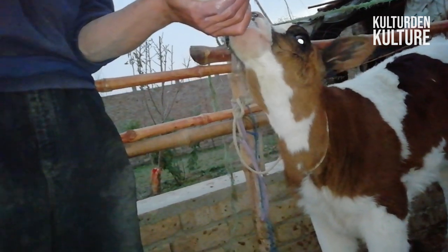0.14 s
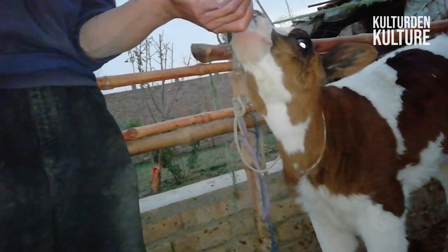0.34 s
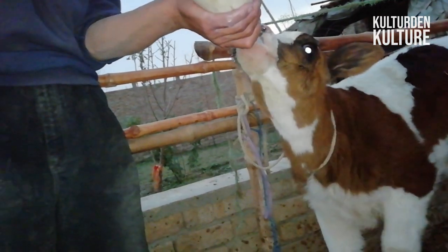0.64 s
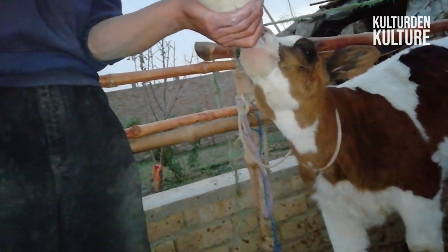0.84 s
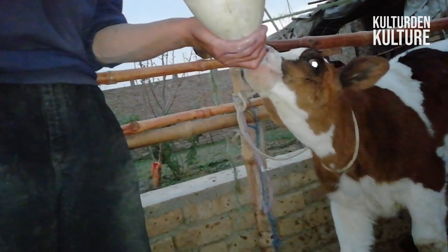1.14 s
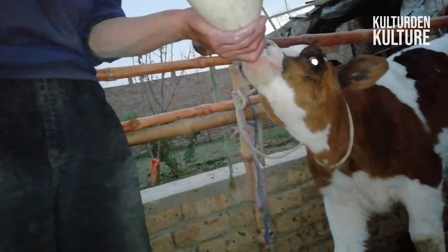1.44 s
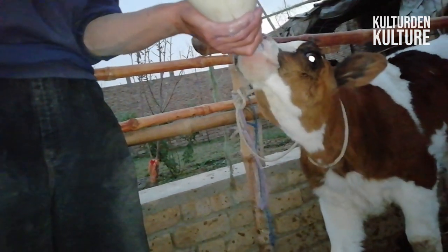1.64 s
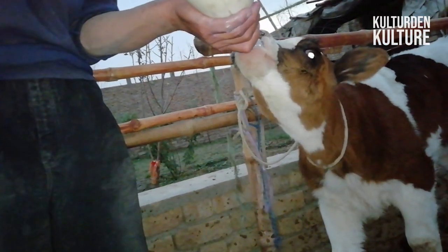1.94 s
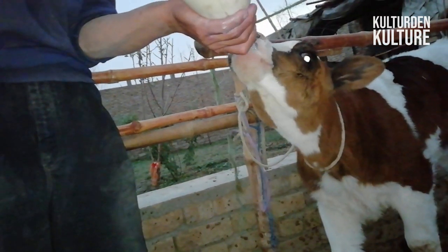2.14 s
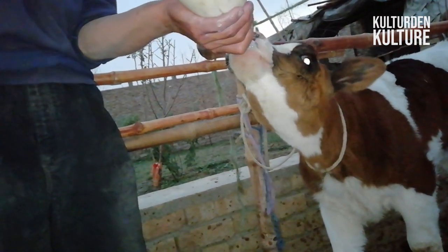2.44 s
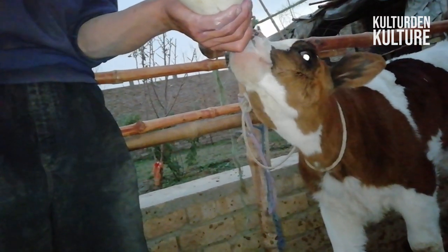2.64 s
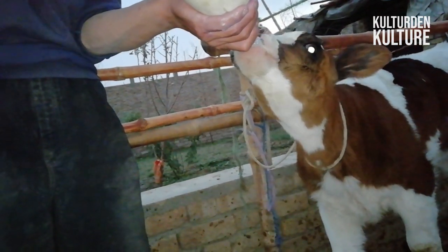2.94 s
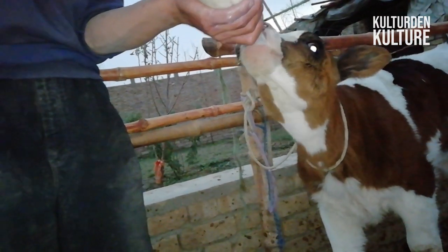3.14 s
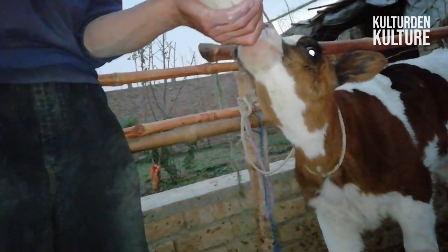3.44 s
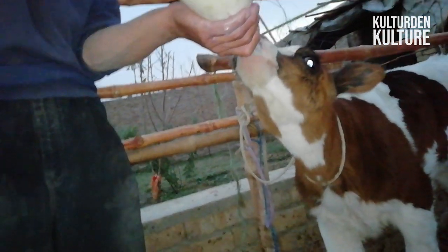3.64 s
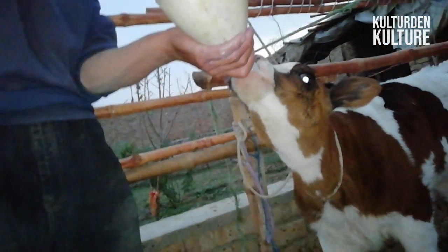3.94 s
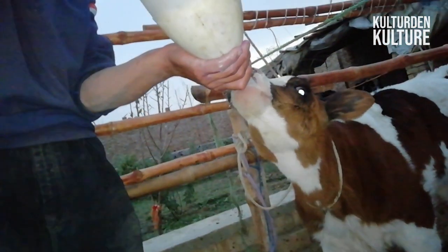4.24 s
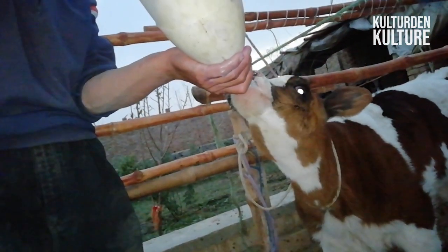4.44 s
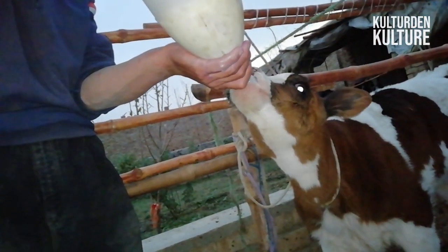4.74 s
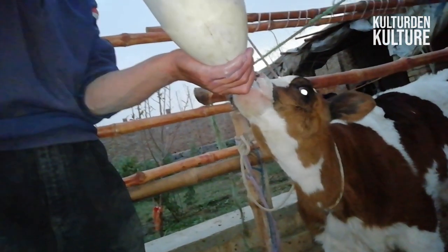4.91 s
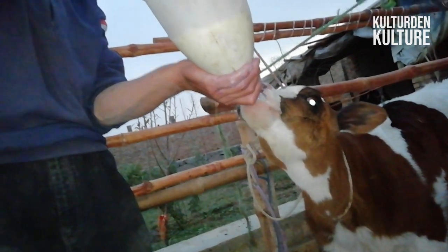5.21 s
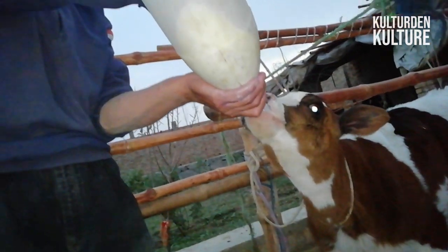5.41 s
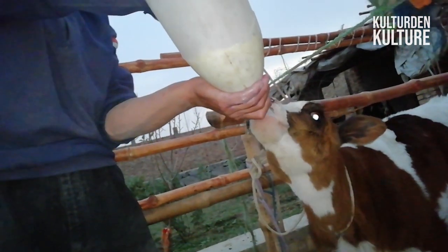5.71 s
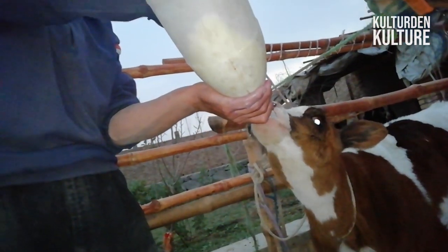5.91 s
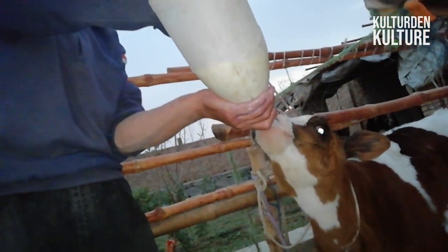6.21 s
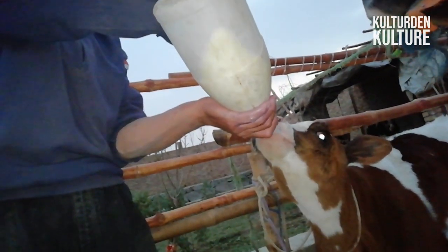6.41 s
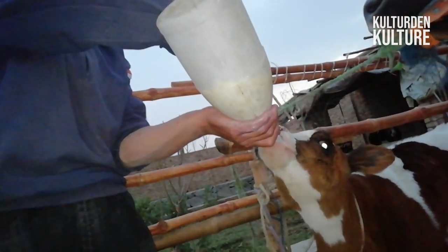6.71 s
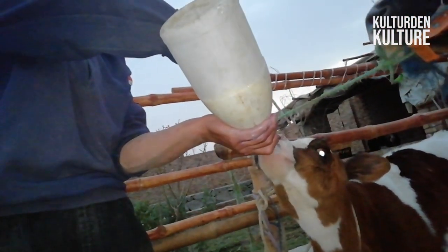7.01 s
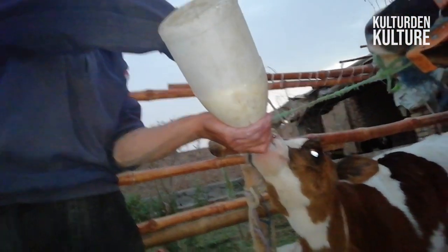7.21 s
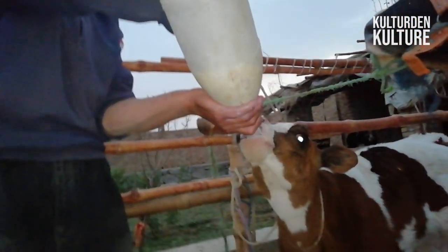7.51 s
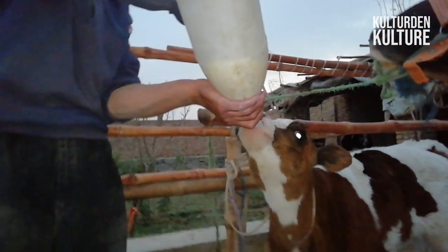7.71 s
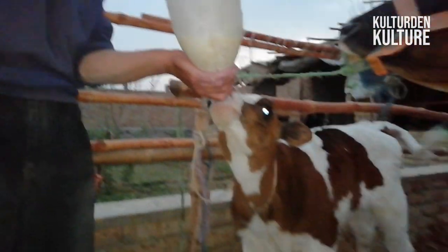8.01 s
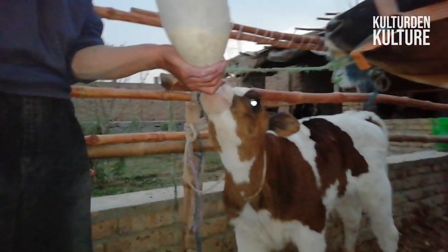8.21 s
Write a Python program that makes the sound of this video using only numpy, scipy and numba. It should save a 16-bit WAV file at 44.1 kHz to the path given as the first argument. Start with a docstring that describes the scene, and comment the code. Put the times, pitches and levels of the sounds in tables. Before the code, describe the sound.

A calf sucks milk from a plastic bottle in an open pen, a metre or two from the microphone. Its lips and tongue smack, click and squelch throughout, while air glugs hollowly into the bottle and the milk sloshes softly. Air hisses past the teat early on, and a few dry taps sound close by at the end. Light wind rumble, a faint low hum and outdoor hiss lie underneath.

```python
"""Open pen: a calf sucks milk from a hand-held plastic bottle, 1-2 m from a small stereo microphone.
Air glugs into the bottle and rings its cavity; milk sloshes. Tongue and lips pop, click and crackle;
air hisses past the teat. A few dry taps sound close by near the end. Wind rumbles on the microphone
ports over a faint mains hum and the hiss of the yard."""
import sys
import numpy as np
from scipy import signal
from scipy.fft import rfft, irfft, next_fast_len
from scipy.io import wavfile
from scipy.ndimage import uniform_filter1d
from numba import njit

SR = 44100
rng = np.random.default_rng(int(sys.argv[2]) if len(sys.argv) > 2 else 0)


def unload_audio(sound):
    """Save the sound as a 16-bit wav file, at the path given as the first command line argument."""
    columns = np.transpose(np.atleast_2d(sound))
    # keep every value between -1 and 1, then stretch to whole-number steps
    steps = np.round(np.clip(columns, -1, 1) * 32767)
    wavfile.write(sys.argv[1], SR, steps.astype(np.int16))


N = 368676
T = np.arange(N) / SR

# pulls on the teat: t/s, squelch level/dB, hiss level/dB
TEAT_PULLS = [(0.0, -54, -60), (0.7, -59, -52.5), (1.22, -57.5, -47.5), (1.65, -57.5, -59.5),
              (2.05, -81, -76), (2.619, -65.5, -70), (3.139, -65, -59), (3.55, -58.5, -78),
              (4.0, -68.5, -74), (4.47, -58, -65), (5.05, -62.5, -72), (5.5, -62, -92), (5.921, -66.5, -63),
              (6.38, -63.5, -66), (6.99, -62, -71), (7.45, -73, -84), (8.269, -61.5, -58)]


def glugs():
    """Each air bubble rings the bottle cavity, with a duller gulp below."""
    # bubbles: t/s, level/dB, f/Hz
    bubbles = [(0.035, -43.5, 279), (0.307, -37.5, 282), (0.502, -43, 269), (0.575, -45, 288),
               (0.723, -35, 182), (0.769, -34.5, 271), (0.859, -41, 282), (1.05, -47, 283),
               (1.127, -49.5, 227), (1.197, -34.5, 265), (1.293, -38.5, 289), (1.403, -45, 266),
               (1.504, -50, 273), (1.623, -40.5, 295.5), (1.638, -34.5, 288), (1.711, -40, 275),
               (1.917, -44.5, 246), (2.112, -39.5, 258), (2.138, -41, 279), (2.224, -47, 275),
               (2.253, -46.5, 266), (2.454, -54, 260), (2.593, -41, 271), (2.62, -40, 277),
               (2.651, -39, 281), (2.69, -35, 281), (3.086, -36.5, 278.5), (3.161, -37, 273),
               (3.358, -46, 249), (3.392, -47, 271), (3.476, -47, 230), (3.525, -37.5, 280),
               (3.577, -42, 276), (3.605, -39.5, 282), (3.863, -38, 277), (3.924, -44.5, 283),
               (3.971, -40, 277), (4.02, -37, 275), (4.112, -43.5, 276), (4.148, -41, 264),
               (4.287, -44, 289), (4.342, -43.5, 287), (4.412, -58, 260), (4.473, -40, 280),
               (4.538, -41.5, 278), (4.619, -43.5, 271), (4.788, -55, 300), (4.863, -49, 215),
               (4.996, -40, 285), (5.072, -42, 268), (5.098, -39, 270), (5.218, -45, 208),
               (5.337, -44, 266), (5.456, -43.5, 275), (5.652, -46, 267), (5.809, -47.5, 286),
               (5.886, -50, 260), (5.936, -44, 277), (5.99, -42, 276), (6.049, -43.5, 274),
               (6.38, -48, 226), (6.455, -43, 289), (6.585, -40.5, 269), (7.017, -41, 281),
               (7.097, -44, 265), (7.44, -42.5, 274), (7.54, -44, 274), (8.002, -44.5, 277),
               (8.091, -40, 274), (8.127, -49, 298), (8.209, -41, 280), (8.265, -53, 263)]
    t_s, db, hz = with_small(bubbles, per_s=2, low_hz=193, high_hz=316.5, top_db=-49)
    pitch, late, length = rng.random((len(t_s), 3)).T
    t60_s = 0.11 * (0.75 + 0.56 * length)
    cavity = rings(t_s - 0.006, db + 3, hz, t60_s, rise_s=0.011, glide=0.031)
    gulp_hz = hz * (0.623 + 0.38 * pitch)
    gulp = rings(t_s + 0.02114 * late, db - 4, gulp_hz, t60_s=0.1, rise_s=0.01, glide=0.043)
    return nearby(cavity + gulp, wet_db=-13, t60_s=0.07)


def slosh():
    """Milk sloshing in the bottle murmurs in two overtones."""
    # sloshes: t/s, level/dB
    sloshes = [(0.116, -55), (4.276, -51.5), (4.568, -58), (4.644, -71), (5.074, -55), (5.482, -52)]
    lower = unit(band(band(wide_noise(), 546.3, 55), 546.3, 88))
    upper = unit(band(band(wide_noise(), 1010, 82), 1010, 130))
    envelope = bursts(*np.transpose(sloshes), t60_s=0.61, rise_s=0.033)
    return envelope * undb(1.3 * walk(15)) * (lower + undb(-4) * upper)


def pops():
    """A wet seal tears open in a quick run of plops; froth squelches after it."""
    # mouth smacks: t/s, level/dB, f/Hz
    smacks = [(0.032, -42, 614), (0.054, -34, 1600), (0.096, -33, 1560), (0.254, -36.5, 1510),
              (0.298, -41, 1500), (0.311, -42, 710), (0.353, -42, 930), (0.446, -38, 1700),
              (0.653, -43.5, 660), (0.722, -40.5, 1030), (0.775, -41, 1440), (0.831, -37, 1470),
              (0.954, -42, 2100), (1.057, -43.5, 1320), (1.134, -42, 1070), (1.205, -36.5, 1190),
              (1.264, -39.5, 1390), (1.318, -43, 906), (1.542, -34, 1900), (1.607, -45, 1030),
              (1.654, -32.5, 2230), (1.724, -32.5, 1405), (1.845, -35, 1090), (1.872, -39.5, 1030),
              (1.923, -45.5, 1260), (2.015, -39.5, 1790), (2.026, -37, 1034), (2.14, -43.5, 980),
              (2.294, -48, 1760), (2.338, -48.5, 2000), (2.478, -50, 1410), (2.527, -53, 1710),
              (2.658, -38.5, 1150), (2.701, -39.5, 1035), (3.039, -45, 1520), (3.093, -38, 1690),
              (3.134, -41.5, 1970), (3.191, -42, 970), (3.324, -45, 1380), (3.388, -42.5, 970),
              (3.407, -41, 694), (3.541, -30.5, 1275), (3.59, -40, 1130), (3.744, -32.5, 1210),
              (3.94, -48, 1940), (3.965, -40.5, 476), (4.067, -44, 2020), (4.21, -45, 720),
              (4.226, -34, 1210), (4.282, -32, 1100), (4.46, -43.5, 490), (4.516, -44, 947),
              (4.603, -42, 990), (4.628, -38.5, 1190), (4.907, -35.5, 1240), (4.993, -34.5, 1160),
              (5.116, -38, 1900), (5.222, -33.5, 1077), (5.286, -40.5, 598), (5.457, -31, 1047),
              (5.516, -35.5, 1120), (5.549, -39.5, 960), (5.77, -45.5, 1080), (5.91, -43.5, 1180),
              (5.996, -38.5, 1830), (6.101, -48.5, 1240), (6.305, -56, 1120), (6.39, -48.5, 755),
              (6.458, -42.5, 1760), (6.596, -38.5, 987), (6.693, -42.5, 2100), (6.823, -45, 1520),
              (6.948, -46.5, 1210), (7.124, -48, 1380), (7.37, -44, 1260), (7.502, -48, 1160),
              (7.876, -46.5, 960), (8.09, -46, 1700), (8.114, -44, 1220), (8.153, -43.5, 1130)]
    pop_s = 0.011
    t_s, db, hz = with_small(smacks, per_s=2.5, low_hz=490, high_hz=2305, top_db=-51.5)
    plop_s, plop_db, plop_hz = cluster(t_s, db + 2.5, hz, count=9, span_s=1.8 * pop_s,
                                       log_spread=0.392, under_db=5.64, lead=0.1995)
    plops = rings(plop_s, plop_db, plop_hz, t60_s=24 / plop_hz, rise_s=3.17 / plop_hz)
    squelch = bursts(t_s + 0.0025, db - 15, t60_s=9 * pop_s, rise_s=0.011)
    return nearby(plops, wet_db=-2, t60_s=0.032) + squelch * froth()


def clicks():
    """Lips snap on the teat: hard cracks are brief, softer clicks ring longer."""
    # lip clicks: t/s, level/dB, f/Hz, left minus right/dB
    lip_clicks = [(0.0243, -36, 3240, -6), (0.0542, -21.5, 5140, -9), (0.0995, -40, 2230, -8),
                  (0.178, -42.5, 5630, -6), (0.255, -27, 5420, -7.5), (0.462, -28, 4970, -1),
                  (0.5, -41.5, 5850, -12), (0.5611, -31, 5800, 0), (0.607, -35, 3700, -2),
                  (0.647, -40, 3800, -1), (0.6845, -32.5, 6150, -4), (0.7066, -39.5, 3750, -2),
                  (0.958, -38.5, 3670, -3), (1.034, -39, 6980, -5), (1.053, -40, 5440, -3),
                  (1.136, -31.5, 2940, 2), (1.1676, -27, 3950, 5), (1.54, -30.5, 6200, -1),
                  (1.616, -40, 6100, -8), (1.709, -37, 3670, 1), (1.721, -34.5, 4140, 2),
                  (1.759, -41.5, 3000, -1), (1.998, -44.5, 2740, 0), (2.137, -43, 6370, 0),
                  (2.254, -40, 2920, 4), (2.3396, -46, 2870, -3), (2.502, -48, 3590, 1),
                  (2.5588, -32.5, 5080, -3), (2.652, -40, 3970, -7), (2.6856, -42, 2480, 0),
                  (2.704, -38.5, 3430, -2), (2.9335, -34, 4280, -10.5), (2.966, -42, 4070, -2),
                  (3.021, -37.5, 4840, -1), (3.0948, -27.5, 5800, -2), (3.133, -33.5, 4180, -1),
                  (3.2384, -19.5, 3200, -2.5), (3.336, -39, 5140, 1), (3.468, -38, 4200, 3),
                  (3.5409, -38, 5630, -3.5), (3.597, -38.5, 3560, -2), (3.612, -37, 5360, -4),
                  (3.743, -35.5, 3660, -1), (3.8911, -43, 3000, 0), (4.155, -37, 2930, -4),
                  (4.2895, -48, 3050, -9), (4.52, -50, 2740, 2), (4.646, -38.5, 3170, 0),
                  (4.865, -45.5, 3460, 5), (4.903, -29, 3540, 0), (5.222, -42.5, 3600, -3),
                  (5.467, -42.5, 5700, -7), (5.53, -39.5, 3620, -3), (5.679, -42, 4700, 0),
                  (5.78, -41, 3240, -1), (5.806, -42, 3480, 1), (5.887, -40.5, 3780, 0),
                  (5.915, -40, 2530, -7), (5.9258, -31.5, 3500, 3), (6.223, -40.5, 3630, 0),
                  (6.2573, -42, 3500, -2), (6.308, -47.5, 3170, -6), (6.3912, -44, 3680, -6),
                  (6.413, -48, 2690, -2), (6.451, -42, 2710, -4), (6.595, -42.5, 2560, -5),
                  (6.6063, -36.5, 5800, -8.5), (6.6921, -38.5, 2630, -5), (6.873, -37, 3900, 1),
                  (6.9498, -39, 4160, -1), (7.0016, -38, 3100, 4), (7.1275, -36.5, 3060, -5),
                  (7.3734, -41, 3830, -3), (7.609, -47.5, 2690, -9), (7.6884, -25.5, 3290, -3),
                  (7.883, -36, 3970, 3), (7.994, -42.5, 2500, -7), (8.1185, -37.5, 4730, -4),
                  (8.177, -37.5, 4000, -3)]
    count = 5
    t_s, db, hz = with_small(lip_clicks, per_s=2.5, low_hz=2500, high_hz=6000, top_db=-43)
    pan_db = np.pad(np.transpose(lip_clicks)[3], (0, len(t_s) - len(lip_clicks)))  # small ones centred
    snap_s, snap_db, snap_hz = cluster(t_s, db + 3.5, hz, count, span_s=1.8 * 0.012,
                                       log_spread=0.33, under_db=11, lead=0.0598)
    cycles = np.clip(11.2 - 0.48 * (db + 18.5), 8, 40)
    t60_s = np.repeat(cycles, count) / snap_hz
    side_db = np.repeat(pan_db / 2, count)
    sides = [rings(snap_s, snap_db + sign * side_db, snap_hz, t60_s, 0.063 * t60_s) for sign in (1, -1)]
    return nearby(np.array(sides), wet_db=-4.5, t60_s=0.06)


def spurts():
    """Air and spit escape in brief bright puffs."""
    # puffs: t/s, level/dB
    puffs = [(0.5616, -29.5), (0.597, -36.5), (0.6749, -42), (0.957, -48), (1.056, -42), (1.1338, -46),
             (1.265, -57), (1.7205, -47), (2.931, -49), (2.9477, -50), (3.6097, -50), (3.6636, -52),
             (3.689, -50), (3.7324, -49), (5.2215, -46.5), (5.257, -50.5), (5.459, -47.5), (5.677, -47),
             (5.938, -51), (6.048, -50), (6.169, -42), (6.457, -48), (6.5929, -52), (6.944, -45.5),
             (8.094, -49), (8.1194, -47.5)]
    # puff spectrum: f/Hz, level/dB
    spectrum = [(1500, -30), (3500, -10), (6000, -1.5), (9000, -5), (11000, -25), (15500, -21)]
    t_s, db = np.transpose(puffs)
    t60_s = 0.029
    envelope = bursts(t_s + 0.11 * t60_s, db - 5.5, t60_s, rise_s=0.24 * t60_s)
    return envelope * unit(shaped(wide_noise(), spectrum))


def draws():
    """Two long draws of air sizzle past the teat."""
    # draws: t/s, level/dB, rise/s, hold/s, t60/s
    air_draws = [(0.561, -47.5, 0.22, 0.0092, 0.29), (1.073, -47.5, 0.069, 0.19, .5)]
    # sizzle spectrum: f/Hz, level/dB
    spectrum = [(1180, -10), (2000, -7), (2090, -16), (2240, -6), (3900, -9), (5500, 4.5), (8360, -2),
                (10400, -21.5), (15500, -21)]
    t_s, db, rise_s, hold_s, t60_s = np.transpose(air_draws)
    sizzle = unit(shaped(wide_noise() * undb(2 * walk(89.4)), spectrum))
    return bursts(t_s, db, t60_s, rise_s, hold_s) * sizzle


def squeak():
    """Air whistles thinly through the teat, once."""
    # squeak: t/s, level/dB, t60/s, rise/s
    event = [(5.718, -61, 0.85, 0.023)]
    return bursts(*np.transpose(event)) * unit(band(band(wide_noise(), 5800, 250), 5800, 350))


def sucking():
    """Froth squelches and crackles, air leaks past the teat; both swell with each pull."""
    # leak spectrum: f/Hz, level/dB
    spectrum = [(1180, -3), (2000, -3), (2330, -8.5), (3200, -6), (4400, -5), (5640, -3.5), (10800, -22),
                (15500, -45)]
    t_s, squelch_db, hiss_db = np.transpose(TEAT_PULLS)
    rise_s, t60_s = 0.24, 0.63
    foam = froth()
    crackle = saliva(per_s=200, low_hz=657, high_hz=3140, cycles=17.7, spread_db=4.56)
    squelch = 0.38 * foam + 0.63 * nearby(crackle, wet_db=-0.5, t60_s=0.04)
    leak = unit(shaped(wide_noise() * undb(4.5 * walk(45)), spectrum))
    fizz = saliva(per_s=200, low_hz=3000, high_hz=7220, cycles=19, spread_db=3.4)
    hiss = 0.6 * leak + 0.31 * nearby(fizz, wet_db=-0.72, t60_s=0.045)
    squelch_gain = undb(-73) + bursts(t_s, squelch_db, t60_s, rise_s)
    hiss_gain = undb(-63) + bursts(t_s, hiss_db, t60_s, rise_s)
    return squelch_gain * squelch + hiss_gain * hiss


def froth():
    """Flickering froth noise in the mouth resonances, unit RMS."""
    # mouth resonances: f/Hz, width/Hz, level/dB
    resonances = [(720, 2250, 2.5), (1030, 150, 10), (1380, 460, -14), (1760, 300, -29)]
    noise = wide_noise() * undb(5 * walk(70))
    return unit(sum(undb(db) * band(band(noise, hz, 2 * width_hz), hz, width_hz)
                    for hz, width_hz, db in resonances))


def saliva(per_s, low_hz, high_hz, cycles, spread_db):
    """Tiny bubbles of saliva and milk burst at random, unit RMS."""
    when, pitch, size = rng.random((int(per_s * N / SR), 3)).T
    hz = low_hz * (high_hz / low_hz) ** pitch
    db = spread_db * np.minimum(-np.log(1 - size), 3.5)
    return unit(rings(when * N / SR, db, hz, t60_s=cycles / hz, rise_s=1 / hz))


def taps():
    """Dry taps near the microphone: broad impulses, hardly any ring."""
    # taps: t/s, level/dB
    hits = [(8.088, -42), (8.118, -35), (8.135, -31), (8.159, -33), (8.267, -22.5), (8.279, -42),
            (8.3, -43)]
    # tap spectrum: f/Hz, gain/dB
    spectrum = [(60, 0), (200, 9.5), (1500, 1.5), (4000, -5), (7000, -25), (15000, -34)]
    t_s, db = np.transpose(hits)
    impulses = np.zeros(N)
    impulses[((t_s + 0.0013) * SR).astype(int)] = -undb(db + 13.5)
    return nearby(shaped(impulses, spectrum), wet_db=-7, t60_s=0.025)


def wind():
    """Low turbulence presses on both ports nearly alike; strong gusts reach deeper."""
    # gusts: t/s, level/dB
    gusts = [(0.23, -60), (0.74, -55), (1.23, -60), (1.38, -54), (1.49, -44), (1.68, -45), (1.79, -55),
             (2.22, -73), (2.51, -58), (2.68, -57), (2.79, -49), (2.96, -49.5), (3.15, -53), (3.26, -50),
             (3.38, -56.5), (4.6, -62), (5.08, -69), (7.57, -58.5), (8.1, -49), (8.27, -54)]
    breeze = undb(-62.5 + 1.2 * walk(4.65))
    strength = breeze + bursts(*np.transpose(gusts), t60_s=0.3, rise_s=0.08)
    deep = unit(band(band(wide_noise(), 27.5, 30), 24, 49))
    rumble = unit(band(band(wide_noise(), 78, 37.6), 51, 53))
    return undb(24.5) * strength ** 1.51 * deep + undb(-1.5) * strength * rumble


def hum():
    """Mains tone, wavering in pitch and level."""
    # hum envelope: t/s, level/dB
    envelope = [(0.0, -66.5), (0.72, -67), (0.95, -70.5), (1.51, -63), (2.63, -71.5), (3.51, -79),
                (4.1, -61), (4.47, -67), (6.33, -70.5), (7.87, -62), (8.13, -55.5), (8.36, -54)]
    db = np.interp(T, *np.transpose(envelope))
    hz = 117.9 + 1.35 * walk(4.4)
    tone = np.sqrt(2) * np.sin(2 * np.pi * np.cumsum(hz) / SR)
    return undb(db + 1.45 * walk(3)) * tone


def yard():
    """Near-steady outdoor hiss, with faint narrow resonances of the microphone ports."""
    # hiss spectrum: f/Hz, level/dB
    spectrum = [(15, -52), (25, 9.5), (104, -8), (165, -0.5), (275, 2), (391, -12.5), (586, -20.5),
                (977, -19.5), (2250, -29), (2800, -25), (5340, -14.5), (8000, -24.5), (10200, -28),
                (14500, -27.5), (15700, -29)]
    # port resonances: f/Hz, width/Hz, level/dB
    peaks = [(4740, 300, -25), (6130, 310, -34), (7940, 810, -13)]
    hiss = unit(shaped(wide_noise(), spectrum))
    port_resonances = sum(undb(db) * unit(band(wide_noise(), hz, width_hz)) for hz, width_hz, db in peaks)
    return undb(-61 + 0.11 * walk(2.95)) * (hiss + port_resonances)


def nearby(x, wet_db, t60_s):
    """Add short scatter off hand, muzzle, rails and ground, different at each port."""
    t_s = np.arange(int(t60_s * SR)) / SR
    echoes = rng.standard_normal((2, len(t_s))) * (rng.random((2, len(t_s))) < 0.05)
    echoes *= undb(-60 * t_s / t60_s) * (t_s > 0.0015)
    echoes /= np.sqrt(np.sum(echoes ** 2, axis=1, keepdims=True))
    return x + undb(wet_db) * signal.fftconvolve(x * np.ones((2, 1)), echoes, axes=1)[:, :N]


def with_small(rows, per_s, low_hz, high_hz, top_db):
    """Columns t/s, level/dB, f/Hz, extended by small events around the pulls."""
    pull, late, size, pitch = rng.random((int(per_s * N / SR), 4)).T
    pull_s = np.transpose(TEAT_PULLS)[0][(pull * len(TEAT_PULLS)).astype(int)]
    t_s = np.clip(pull_s + 0.37 * (late - 0.5), 0, N / SR)
    small = t_s, top_db - 6.5 * size, low_hz * (high_hz / low_hz) ** pitch
    return np.concatenate([np.transpose(rows)[:3], small], axis=1)


def cluster(t_s, db, hz, count, span_s, log_spread, under_db, lead):
    """Split each event into a main snap and weaker scattered ones; a share `lead` comes early."""
    late, pitch, size = rng.random((len(t_s), 3, count)).transpose(1, 0, 2)
    main = np.arange(count) == 0
    t_s = t_s[:, None] + np.where(main, 0, (late - lead) * span_s)
    hz = hz[:, None] * np.exp(np.where(main, 0, log_spread * (2 * pitch - 1)))
    db = db[:, None] - np.where(main, 0, under_db + 5 * size + 8 * np.abs(late - lead))
    return t_s.ravel(), db.ravel(), hz.ravel()


def rings(t_s, db, hz, t60_s, rise_s, glide=0.):
    """One damped sine per event; pitch rises by the share `glide` over t60."""
    ones = np.ones(len(t_s))
    start = np.clip((t_s * SR).astype(np.int64), 0, N - 1)
    return damped_sines(start, undb(db), hz, np.maximum(t60_s, 0.002) * ones, rise_s * ones, glide)


@njit
def damped_sines(start, gain, hz, t60_s, rise_s, glide):
    y = np.zeros(N)
    for e in range(len(start)):
        phase, n = 0., int(t60_s[e] * SR)
        for i in range(min(n, N - start[e])):
            phase += 2 * np.pi * hz[e] * (1 + glide * i / n) / SR
            envelope = 1000. ** (-i / n) * min(1., i / (rise_s[e] * SR))
            y[start[e] + i] += gain[e] * envelope * np.sin(phase)
    return y


def bursts(t_s, db, t60_s, rise_s, hold_s=0.):
    """Envelope: rise to each event time, hold, decay."""
    envelope = np.zeros(N)
    for peak_s, peak_db, fade_s, up_s, stay_s in np.broadcast(t_s, db, t60_s, rise_s, hold_s):
        span = slice(max(int((peak_s - up_s) * SR), 0), int((peak_s + stay_s + fade_s) * SR))
        age_s = np.maximum(T[span] - peak_s + up_s, 0)
        decay_db = 60 * np.maximum(age_s - up_s - stay_s, 0) / fade_s
        envelope[span] += undb(peak_db - decay_db) * np.minimum(age_s / up_s, 1) ** 2
    return envelope


def wide_noise():
    """Stereo white noise, correlated per band as in open air."""
    # channel likeness: f/Hz, left-right correlation
    correlation = [(30, .95), (70, .92), (300, .9), (620, .1), (1200, .55), (3000, .15), (8000, .1)]
    mid, side = rng.standard_normal((2, N))
    mid = filtered(mid, lambda hz: np.sqrt((1 + at(correlation, hz)) / 2))
    side = filtered(side, lambda hz: np.sqrt((1 - at(correlation, hz)) / 2))
    return np.array([mid + side, mid - side])


def walk(rate_hz):
    """Random steps, smoothed twice; spread near 1."""
    n = int(SR / rate_hz)
    steps = np.repeat(rng.standard_normal(N // n + 1), n)
    return 1.42 * uniform_filter1d(uniform_filter1d(steps, n), n)[:N]


def band(x, hz, width_hz):
    """One resonance, unity peak gain."""
    return signal.lfilter(*signal.iirpeak(hz, hz / width_hz, fs=SR), x)


def shaped(x, spectrum):
    """Filter by (f/Hz, gain/dB) points."""
    return filtered(x, lambda hz: undb(at(spectrum, hz)))


def filtered(x, gain):
    """Apply gain(f/Hz) to the spectrum."""
    size = next_fast_len(N + 4096)
    hz = np.arange(size // 2 + 1) * SR / size
    return irfft(rfft(x, size) * gain(hz), size)[..., :N]


def at(points, hz):
    """Interpolate (f/Hz, value) points over log frequency."""
    point_hz, values = np.transpose(points)
    return np.interp(np.log(np.maximum(hz, 1)), np.log(point_hz), values)


def undb(db):
    return 10 ** (np.asarray(db) / 20)


def unit(x):
    return x / np.sqrt(np.mean(x ** 2))


def scene():
    """Calf and bottle over taps, wind, hum and yard."""
    calf = glugs() + slosh() + pops() + clicks() + spurts() + draws() + squeak() + sucking()
    return calf + taps() + wind() + hum() + yard()


def record(dry):
    """Two ports of complementary colour, the right slightly late; steep low-pass."""
    # port balance: f/Hz, left minus right/dB
    balance = [(60, 4), (110, -6), (200, 2.5), (380, -3.5), (700, -1.5), (1290, -1), (2380, -4),
               (4400, -13.5), (8120, 0.5), (15000, -1.5)]
    right_lag_s, cutoff_hz = 40e-6, 15800
    right_gain = lambda hz: 2 / (1 + undb(at(balance, hz)))
    left = filtered(dry[0], lambda hz: 2 - right_gain(hz))
    right = filtered(dry[1], lambda hz: right_gain(hz) * np.exp(-2j * np.pi * hz * right_lag_s))
    lowpass = signal.ellip(10, 0.2, 70, cutoff_hz, fs=SR, output="sos")
    return signal.sosfilt(lowpass, np.array([left, right]))


dry = scene()
out = record(dry)
unload_audio(out)
```